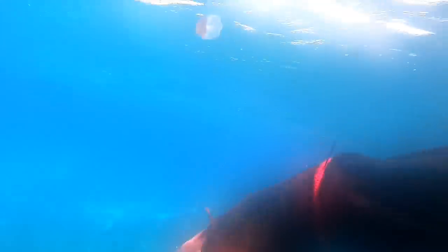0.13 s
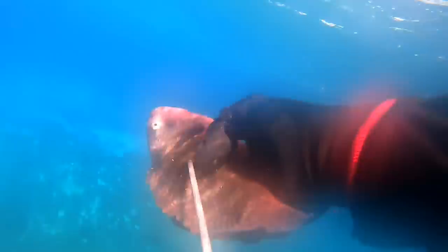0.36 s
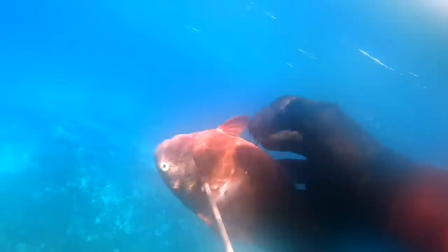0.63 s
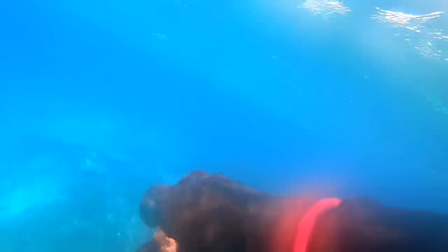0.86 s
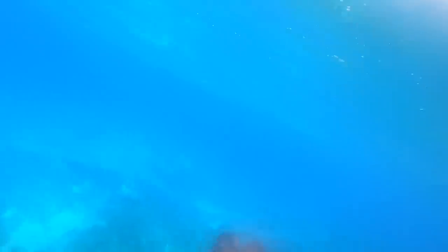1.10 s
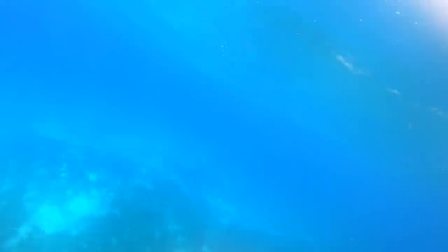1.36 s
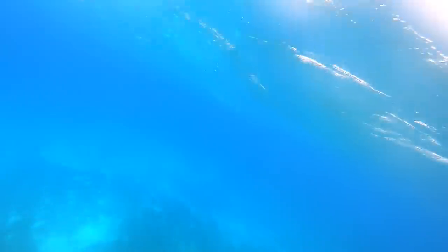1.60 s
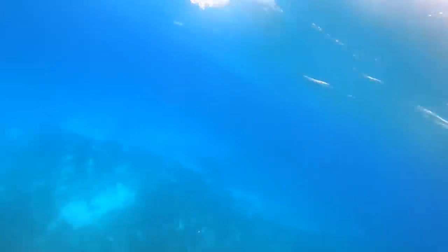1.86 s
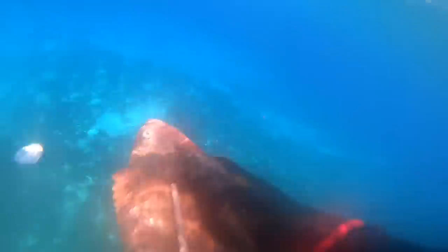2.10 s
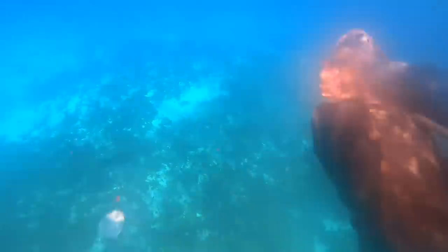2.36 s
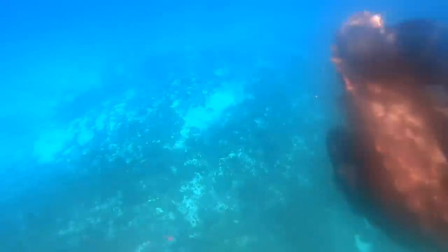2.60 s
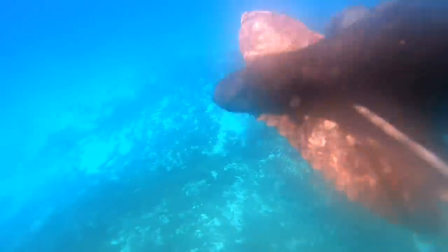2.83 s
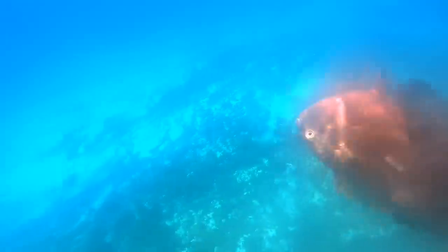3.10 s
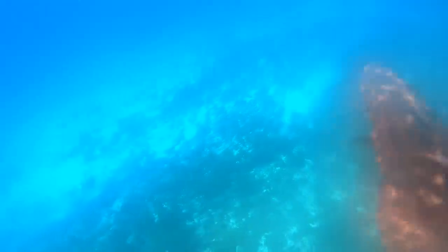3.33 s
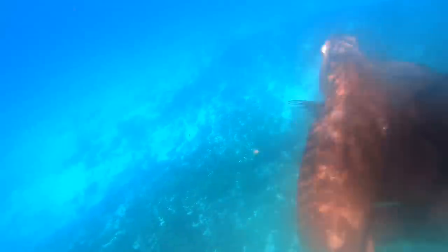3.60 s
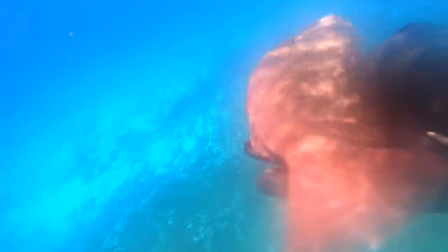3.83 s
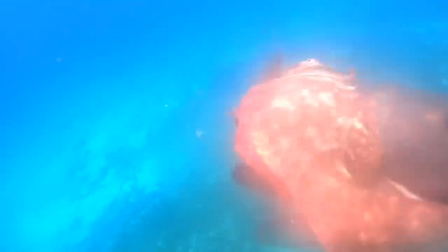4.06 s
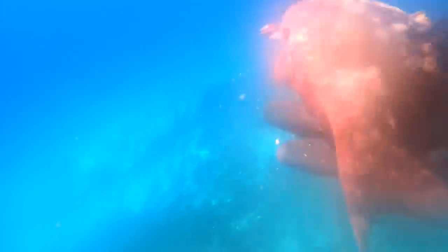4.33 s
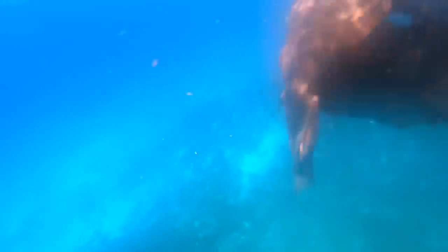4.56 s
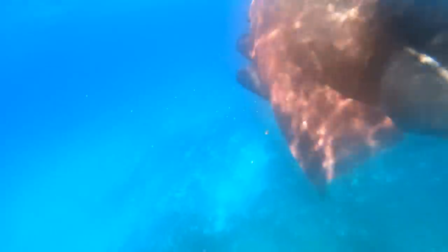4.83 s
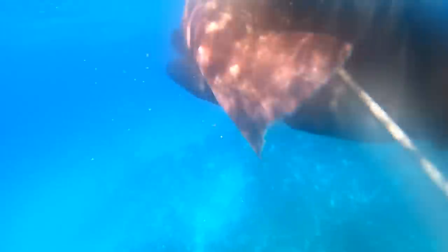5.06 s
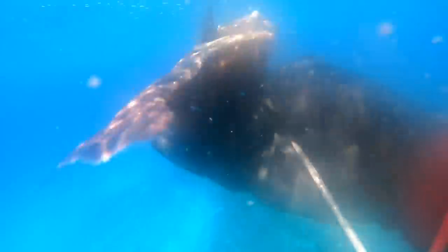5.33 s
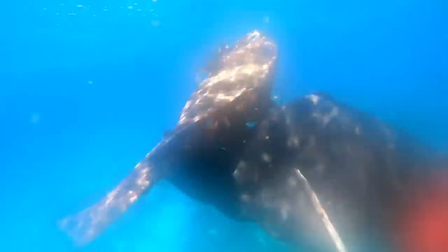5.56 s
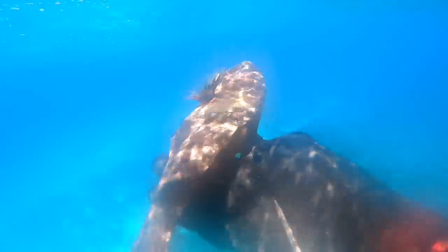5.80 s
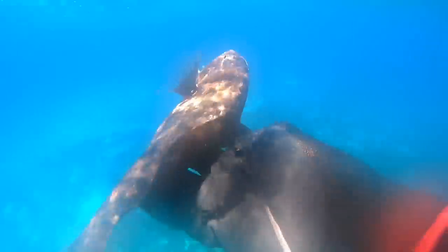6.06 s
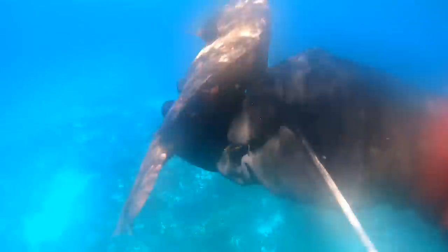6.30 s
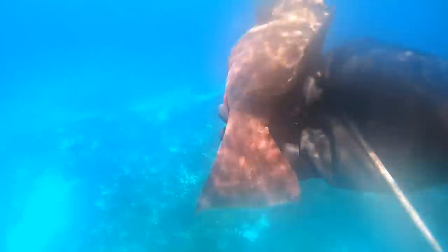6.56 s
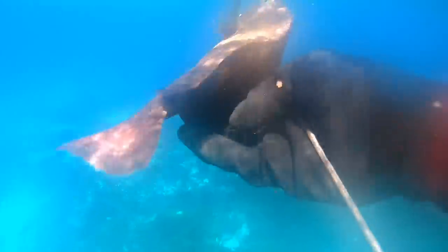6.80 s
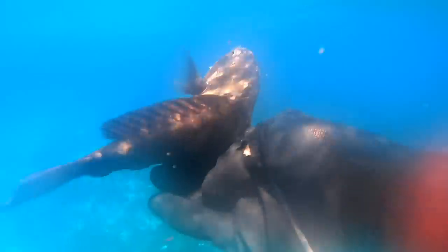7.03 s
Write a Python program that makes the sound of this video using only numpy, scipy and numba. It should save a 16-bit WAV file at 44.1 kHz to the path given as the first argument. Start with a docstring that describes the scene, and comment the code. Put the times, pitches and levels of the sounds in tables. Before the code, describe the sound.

Dull, boomy knocks thud against a sealed underwater housing amid muffled gurgles, then plinking bubbles and fine fizzing crackle over a reef.

```python
"""A brief gurgle and slosh, then dull knocks and plinking bubbles, heard by two microphones
inside a sealed camera housing floating just under the sea surface while a diver handles a spear and a fish.
Knocks and bubbles are dying rings; water, rubs and rushes are noise, clicks or tiny rings that swell and fade.
Behind them, reef snaps, crackle and fizz come through the housing's resonances.
The sound is centred at first, then it opens out to the sides."""
import sys
import numpy as np
from scipy import signal
from scipy.io import wavfile
from numba import njit

SR = 44100
rng = np.random.default_rng(int(sys.argv[2]) if len(sys.argv) > 2 else 0)


def field_ratio(decibels):
    """Amplitude ratio for a level in dB (20 dB per decade); scalars and array-likes work."""
    return 10 ** (np.asarray(decibels, dtype=float) / 20)


def dump(signal):
    """Clip the signal to [-1, 1] and save it as 16-bit WAV at the path in sys.argv[1]."""
    limited = np.clip(np.atleast_2d(signal).T, -1, 1)
    pcm = np.round(limited * 32767).astype(np.int16)
    wavfile.write(sys.argv[1], SR, pcm)


N = 316197  # length in samples


@njit
def svf(x, hz, width):
    """State-variable band-pass: lets one band through, gain 1 at its centre."""
    y, band, low = np.empty(len(x)), 0., 0.
    g, k = np.tan(np.pi * hz / SR), width / hz
    for i in range(len(x)):
        v = (band + g * (x[i] - low)) / (1 + g * (g + k))
        band, low, y[i] = 2 * v - band, low + 2 * g * v, k * v
    return y


@njit
def rings(n, s, hz, t60, size, rise, glide):
    """Dying sine rings that swell over a rise time; their pitch gains the share glide per second."""
    y = np.zeros(n)
    for j in range(len(s)):
        start = int(s[j] * SR)
        for i in range(max(min(int(t60[j] * SR), n - start), 0)):
            t = i / SR
            swell = (1 - np.exp(-t / rise[j])) * np.exp(-np.log(1000) * t / t60[j])
            y[start + i] += size[j] * swell * np.sin(2 * np.pi * hz[j] * t * (1 + glide[j] * t / 2))
    return y


def unit(x):
    """Scale to rms 1."""
    return x / np.sqrt(np.mean(x ** 2))


def curves(table):
    """Each column after the time as a value per sample."""
    s, *columns = np.transpose(table)
    return [np.interp(np.arange(N) / SR, s, c) for c in columns]


def through(x, peaks):
    """Steep resonances side by side, alternating in sign."""
    out = np.zeros(len(x))
    for k, (hz, width, db) in enumerate(peaks):
        once = svf(x, 1. * hz, 1.35 * width)
        out += (-1) ** k * field_ratio(db) * svf(once, 1. * hz, 1.35 * width)
    return out


def loudness(chance, spread_db):
    """Random gains: mostly weak, sometimes strong, never extreme."""
    return field_ratio(spread_db * np.minimum(-np.log(chance + 1e-9), 3))


def clicks(rate, spread_db):
    """Random clicks, rate per second on average, a few much stronger than the rest."""
    happens, chance = rng.random((2, N))
    sign = rng.choice([-1., 1.], N)
    return unit((happens < rate / SR) * loudness(chance, spread_db) * sign)


def grains(count, lo_hz, hi_hz, cycles, spread_db, glide):
    """Random short bubble rings of mixed pitch and size; higher ones glide faster."""
    when, pitch, chance, length = rng.random((count, 4)).T
    hz = lo_hz * (hi_hz / lo_hz) ** pitch
    size = loudness(chance, spread_db)
    t60 = cycles * (.5 + length) / hz
    return unit(rings(N, when * N / SR, hz, t60, size, 0.5 / hz, glide * hz))


def flutter(depth):
    """Quick random wavering of level, slower than about 130 Hz."""
    lowpass = signal.butter(4, 130., fs=SR, output="sos")
    return 1 + depth * unit(signal.sosfilt(lowpass, rng.standard_normal(N)))


def swells(s, hold, db, shape):
    """Gain over time of events that swell, hold and fade, over a steady bed."""
    rise, fall, bed_db = shape
    late = np.arange(0, N, 64)[:, None] / SR - s
    level_db = db - rise * np.maximum(-late, 0) - fall * np.maximum(late - hold, 0)
    gain = np.sqrt(np.sum(field_ratio(level_db) ** 2, axis=1) + field_ratio(bed_db) ** 2)
    return np.interp(np.arange(N), np.arange(0, N, 64), gain)


# Blows on the housing. Each row: start in seconds, level in dB, then low ring and edge
# in dB relative to that level, and thud pitch in Hz.
KNOCKS = [(0.074, -17.5, -29, -38, 186), (0.123, -14, -28, -30, 187), (0.167, -12.5, -5.5, -25, 212),
          (0.318, -28.5, -23, -56, 164), (0.589, -19.5, -6, -20.5, 188), (0.625, -17, -22, -21, 200),
          (0.719, -5.5, -19.5, -21, 223), (0.737, -12.5, -10, -22, 166), (0.784, -3, -9.5, -21.5, 433),
          (0.831, -15.5, 4, -48, 169), (0.869, -13, -6.5, -19, 193), (1.005, -10.5, -4, -29, 198),
          (1.028, -11.5, 3.5, -18, 150), (1.053, -17.5, 2, -13.5, 177), (1.083, -23.5, 2, -16, 227),
          (1.114, -16.5, -15, -28, 178), (1.166, -20, 7, -38, 190), (1.243, -9.5, 7, -10.5, 158),
          (1.425, -3.5, -2.5, -22, 198), (1.656, -15, 2, -46, 420), (2.055, -4, -1.5, -16, 202.6),
          (2.203, -17.5, -25, -25.5, 298), (2.209, -4, -5, -28, 196), (2.278, -9.5, -4, -20.5, 234),
          (2.286, -11.5, -24.5, -24.5, 209), (2.568, -19.5, -0.5, -20.5, 440),
          (2.662, -4, -1.5, -13.5, 220.7), (3.698, -29.5, -39, -31, 257), (3.895, -24.5, -21, -6, 424),
          (3.946, -15.5, -26, -41, 204), (4.223, -16, -32, -2.5, 287), (4.508, -35.5, -7, -1.5, 520),
          (4.543, -38.5, 14, 7.5, 284), (4.608, -11, -6, -16.5, 141), (4.63, -18, -37, -51, 195),
          (4.645, -23, 8, -42, 227), (5.487, -25, -1.5, -38, 170), (5.595, -10, -10.5, -21.5, 215),
          (5.849, -14, -2, -19, 210), (5.91, -26.5, -33, -1.5, 580), (6.226, -8.5, -3.5, -17.5, 422),
          (6.473, -30.5, -7, -19, 152), (6.656, -15, 2.5, -11, 204), (6.779, -9.5, -10, -12.5, 209),
          (7.036, -28.5, 4.5, -0.5, 179)]


def stirred(below_db, shape, lag_s):
    """Gain of the brief stir of water that goes with every knock, in dB relative to the knock."""
    s, db = np.transpose(KNOCKS)[:2]
    return swells(s + lag_s, 0, db + below_db, shape)


# Low ring of the housing under a knock, each mode with its own delay.
# Each row: pitch in Hz, level in dB, time to fall 60 dB in seconds, delay in seconds.
LOW_RING = [(85.6, -5.5, 0.22, 0.0065), (53, -8, 0.12, 0.003)]
# Slow sway of the housing. Each row: pitch in Hz, level in dB, 60 dB fall in seconds, delay in seconds.
SWAY = [(31.9, -20, 0.2, 0.016), (63.6, 19, 0.092, 0.004)]
# Middle modes of the thud. Each row: pitch in Hz, level in dB, 60 dB fall in seconds, delay in seconds.
THUD = [(177, -15, 0.09, 0.0053), (415.4, -22.5, 0.081, 0.00643), (507, -19.5, 0.03, 0.005955)]
# High edge of the knock. Each row: pitch in Hz, level in dB, 60 dB fall in seconds, delay in seconds.
EDGE = [(786, 0.86, 0.028, 0.0014)]
# Colour of the noisy crack. Each row: centre in Hz, width in Hz, level in dB.
CRACK = [(1070, 292, 7), (1825, 920, -10.5), (3140, 970, -22)]


def knocks():
    """Every blow sends a falling wave through the housing, rings its modes a little detuned, thuds and cracks."""
    s, db, ring_db, edge_db, hz = np.transpose(KNOCKS)
    one = np.ones(len(s))
    sway_db = -21.5 + 0.44 * db  # so the sway grows faster than the knock itself
    out = rings(N, s + 0.005, hz, 19.4 / hz, field_ratio(db - 10.0), 0.42 / hz, -8.0 * one)
    # fast high waves arrive first, so the first swing falls in pitch
    out += rings(N, s + 0.00241, 485.0 * one, 0.019 * one, field_ratio(db + 5.5), 0.0016 * one, -137. * one)
    for modes, share_db in ((LOW_RING, ring_db), (SWAY, sway_db), (THUD, 0 * s), (EDGE, edge_db)):
        for mode_hz, mode_db, t60, lag in modes:
            detuned = mode_hz * (1 + 0.088 * rng.standard_normal(len(s)))
            size = field_ratio(db + share_db + mode_db)
            out += rings(N, s + lag, detuned, t60 * one, size, 0.39 / mode_hz * one, 0 * s)
    hits = np.zeros(N)
    hits[(s * SR).astype(int)] = field_ratio(db + edge_db + 18.0)
    t = np.arange(2000) / SR / 0.003  # the crack is strongest after 3 ms
    burst = signal.fftconvolve(hits, t * np.exp(-t))[:N]
    return out + through(burst * rng.standard_normal(N), CRACK)


# What the housing lets through. Each row: centre in Hz, width in Hz, level in dB.
HOUSING = [(253, 110, -3), (421, 101, 9.5), (758.7, 67, 3.5), (1125, 600, 8.5), (1410, 1800, -0.5),
           (1690, 63, 12.5), (1952, 57, 6), (2192, 267, 8), (2956, 930, -5), (3257, 89, -2.5)]
# Single bubbles. Each row: start in seconds, level in dB, pitch in Hz, time to fall 60 dB in seconds.
BUBBLES = [(0.0736, -23.5, 1690, 0.075), (0.081, -22.5, 1350, 0.054), (0.432, -31, 2950, 0.024),
           (3.795, -29.5, 375, 0.084), (3.803, -35.5, 768, 0.056), (3.825, -23, 339, 0.072),
           (3.862, -24, 213.3, 0.16), (0.2, -32.5, 1410, 0.032), (1.701, -39, 445, 0.16),
           (1.714, -32.5, 1470, 0.033), (2.36, -32.5, 3110, 0.02), (2.3794, -34.5, 3140, 0.032),
           (2.394, -24.5, 2150, 0.023), (2.405, -34, 2300, 0.029), (2.6, -39, 2200, 0.033),
           (2.487, -34, 717, 0.044), (3.307, -32, 1430, 0.024), (3.4584, -23, 1358, 0.051),
           (4.0158, -40.5, 2034, 0.033), (4.178, -37.5, 3200, 0.033), (4.39, -37, 2710, 0.027),
           (4.287, -27, 1100, 0.044), (4.1032, -36, 2320, 0.051), (4.228, -14, 953, 0.045),
           (4.2853, -30.5, 1630, 0.093), (4.3215, -24.5, 1670, 0.041), (4.3514, -14, 1627, 0.024),
           (4.404, -35, 480, 0.068), (4.32, -39.5, 776, 0.12), (4.384, -39, 796, .15),
           (4.4128, -27.5, 1460, 0.012), (4.434, -37, 2020, 0.046), (4.44, -33.5, 1510, 0.049),
           (4.6098, -22.5, 1690, 0.034), (4.613, -18.5, 142, 0.39), (4.628, -19, 288, 0.24),
           (4.63, -16, 219, 0.14), (4.803, -28, 1600, 0.042), (4.813, -24.5, 1710, 0.045),
           (4.923, -32.5, 1500, .03), (4.756, -28.5, 3270, 0.03), (4.776, -27.5, 2820, 0.023),
           (4.856, -34, 3160, 0.029), (4.945, -34, 3060, 0.023), (4.903, -33.5, 3120, 0.026),
           (4.91, -28.5, 2080, 0.041), (4.975, -19.5, 1510, 0.044), (4.996, -22.5, 1360, 0.037),
           (5.024, -29, 1600, 0.027), (5.021, -26, 2190, 0.028), (5.041, -19, 1600, 0.039),
           (5.0527, -23, 1620, 0.057), (5.062, -25.5, 2060, 0.045), (5.106, -32.5, 1430, 0.056),
           (5.139, -33, 828, 0.098), (5.1514, -15, 1410, 0.037), (5.157, -28, 2090, 0.039),
           (5.2165, -19, 1253, 0.036), (5.239, -30, 1600, 0.061), (5.257, -21, 1380, 0.041),
           (5.336, -33.5, 3120, 0.021), (5.134, -29, 1314, 0.064), (5.226, -30, 1670, 0.026),
           (5.297, -37, 1560, 0.034), (5.3732, -25, 3140, 0.027), (5.387, -27.5, 1810, 0.019),
           (5.42, -32, 2030, .018), (5.524, -22, 2210, .016), (5.572, -29.5, 2020, 0.039),
           (5.41, -21.5, 1410, 0.014), (5.464, -30.5, 2640, 0.031), (5.525, -20.5, 1540, 0.04),
           (5.546, -13, 1487, 0.04), (5.688, -14, 1690, 0.035), (5.8605, -30.5, 2910, 0.02),
           (6.04, -21.5, 1600, 0.015), (6.204, -27, 1490, 0.025), (6.2445, -30, 2280, 0.035),
           (6.351, -30, 205, 0.068), (6.562, -29, 165.3, 0.27), (6.715, -16, 1440, 0.036),
           (7.1133, -19, 2290, 0.028), (7.149, -29.5, 1520, 0.019)]


def bubbles():
    """A tick as each bubble pinches off, then a near-sine that bends and flutters, and a beating neighbour."""
    s, db, hz, t60 = np.transpose(BUBBLES)
    glide = -0.89 + 0 * s  # share of the pitch gained per second: it falls
    rise = 0.059 * t60
    detune = 1 + 0.085 * rng.standard_normal(len(s))
    pinch = np.zeros(N)
    pinch[(s * SR).astype(int)] = field_ratio(db + 1.5)
    tick = through(pinch, HOUSING[2:])
    ring = flutter(0.17) * rings(N, s, hz, t60, field_ratio(db + 2.5), rise, glide)
    neighbour = rings(N, s, hz * detune, 0.48 * t60, field_ratio(db + 4.5), rise, glide)
    return tick + ring + neighbour


# Large bubbles that change size as they slide. Each row: start in seconds, level in dB, pitch in Hz,
# share of the pitch gained per second, time to fall 60 dB in seconds.
SLIDERS = [(.829, -14, 263, -12.5, 0.1), (4.148, -28, 531, -2, 0.16), (4.19, -26.5, 450, -3.5, 0.14),
           (4.425, -33, 400, 14, 0.1), (5.351, -25.5, 683, 5, .1), (5.387, -29.5, 688, 4, 0.13),
           (5.915, -25, 612, -5.5, 0.16)]


def sliders():
    """Bubbles squeezed along the housing: a fluttering ring that glides up or down."""
    s, db, hz, glide, t60 = np.transpose(SLIDERS)
    return flutter(0.3) * rings(N, s, hz, t60, field_ratio(db), 0.034 * t60, glide)


# Surges of water round the housing. Each row: start of the full level in seconds, hold in seconds,
# gurgle level in dB, slosh level in dB.
SURGES = [(0.0, 0.0053, -29, -31.5), (0.16, 0.037, -41.5, -39), (0.435, 0.046, -41.5, -51),
          (0.622, 0.22, -28.5, -26.5), (1.01, 0.05, -23.5, -24.5), (1.66, 0.011, -72, -40),
          (1.775, 0.57, -48.5, -61.5), (2.19, 0.038, -34, -38), (2.384, 0.37, -53, -48.5),
          (2.975, 0.082, -47.5, -58.5), (3.716, 0.0083, -43.5, -78), (3.827, 0.18, -31, -42),
          (4.19, 0.076, -32.5, -39), (4.517, 0.033, -27.5, -37), (4.616, 0.013, -23, -48),
          (4.736, 0.065, -35, -54.5), (5.354, 0.052, -44.5, -68), (5.5, 0.017, -44, -47),
          (6.043, 0.38, -47.5, -66), (6.355, 0.01, -34.5, -36), (6.562, 0.068, -36.5, -59),
          (7.015, 0.18, -49.5, -50)]
# How gurgles come and go. The row: swell in dB per second, fade in dB per second, still-water level in dB.
GURGLE_SHAPE = (780, 195, -60)
# How sloshes come and go. The row: swell in dB per second, fade in dB per second, still-water level in dB.
SLOSH_SHAPE = (276, 95, -82)
# Gurgle stirred by a knock. The row: swell in dB per second, fade in dB per second, steady level in dB.
KNOCK_GURGLE_SHAPE = (860, 1000, -99)
# Slosh stirred by a knock. The row: swell in dB per second, fade in dB per second, steady level in dB.
KNOCK_SLOSH_SHAPE = (2100, 720, -99)


def water():
    """Slow pressure surges and low lumpy gurgles with a rumble of water rubbing past the housing."""
    s, hold, gurgle_db, slosh_db = np.transpose(SURGES)
    slosh = svf(svf(rng.standard_normal(N), 35.0, 64.0), 46.0, 71.0)
    gurgle = grains(count=1500, lo_hz=141.1, hi_hz=506.0, cycles=12.5, spread_db=4.0, glide=0.031)
    rumble = through(rng.standard_normal(N), [(166, 140, 2.0), (320, 750, -3.0), (480, 160, 6.0)])
    # the gurgles are too small to carry deep bass, and the housing muffles their top
    band = signal.butter(3, [115., 560.], "band", fs=SR, output="sos")
    lumps = signal.sosfilt(band, 0.62 * gurgle + 0.16 * unit(rumble))
    lumps += 0.066 * unit(through(clicks(98.0, 3.6), HOUSING[2:3]))
    slosh_stir = stirred(-22, KNOCK_SLOSH_SHAPE, lag_s=0.016)
    gurgle_stir = stirred(-19.5, KNOCK_GURGLE_SHAPE, lag_s=0.0089)
    slosh_gain = np.hypot(swells(s, hold, slosh_db, SLOSH_SHAPE), slosh_stir)
    gurgle_gain = np.hypot(swells(s, hold, gurgle_db, GURGLE_SHAPE), gurgle_stir)
    return slosh_gain * unit(slosh) + gurgle_gain * lumps


# Hands and spear rubbing along the housing.
# Each row: start of the full level in seconds, hold in seconds, level in dB.
RUBS = [(0.579, 0.1, -49), (0.698, 0.069, -39), (1.004, 0.034, -32), (1.05, 0.074, -43.5),
        (1.224, 0.01, -46), (2.043, 0.0083, -39), (2.204, 0.051, -34.5), (2.274, 0.012, -41),
        (2.654, .018, -31.5)]
# How a rub comes and goes. The row: swell in dB per second, fade in dB per second, steady level in dB.
RUB_SHAPE = (3800, 3600, -99)
# Colour of a rub. Each row: centre in Hz, width in Hz, level in dB.
RUB_COLOUR = [(409, 250, 10), (930, 630, -4), (1600, 530, -0.5), (2700, 990, -15.5)]


def rubs():
    """Stick-slip scraping: dense uneven clicks and hiss ring the housing."""
    s, hold, db = np.transpose(RUBS)
    scrape = through(clicks(1800.0, 2.2) + 1.2 * rng.standard_normal(N), RUB_COLOUR)
    return swells(s, hold, db, RUB_SHAPE) * unit(scrape)


# Smooth rushes of water past the ports.
# Each row: start of the full level in seconds, hold in seconds, level in dB.
RUSHES = [(4.605, 0.037, -39), (4.863, 0.19, -50), (5.293, 0.13, -44), (6.042, 0.12, -39.5),
          (6.31, 0.15, -45), (6.553, 0.34, -50)]
# How a rush comes and goes. The row: swell in dB per second, fade in dB per second, steady level in dB.
RUSH_SHAPE = (520, 85, -99)
# Colour of a rush. Each row: centre in Hz, width in Hz, level in dB.
RUSH_COLOUR = [(427, 250, 2.5), (1385, 210, 9), (1600, 120, 6.5), (2180, 260, -8.5), (2950, 330, -28)]


def rushes():
    """Smooth dense water noise, partly different at each microphone."""
    s, hold, db = np.transpose(RUSHES)
    noise = rng.standard_normal(N) + 0.54 * rng.standard_normal((2, N))
    coloured = np.array([through(p, RUSH_COLOUR) for p in noise])
    return swells(s, hold, db, RUSH_SHAPE) * unit(coloured)


# Colour of snaps and crackle. Each row: centre in Hz, width in Hz, level in dB.
CRACKLE = [(2850, 395, 3.5), (4060, 6600, -18), (5030, 210, 2), (5910, 1100, -6), (7900, 2260, -6.5),
           (9800, 2300, -40.5), (13000, 3000, -55.5)]
# Single reef snaps. Each row: start in seconds, level in dB, ring pitch in Hz.
SNAPS = [(0.6588, -46, 4540), (0.8453, -47.5, 3880), (1.197, -44, 3870), (1.2333, -42, 3800),
         (1.331, -35.5, 4060), (1.5756, -35, 4140), (1.694, -42.5, 3860), (1.727, -38, 3880),
         (1.9316, -39, 3930), (1.9531, -36.5, 3750), (2.3305, -39.5, 4000), (3.305, -38.5, 3670),
         (3.4182, -43, 3870), (3.9018, -34.5, 5200), (3.9414, -29.5, 3780), (4.3213, -43, 7850),
         (4.785, -29.5, 5450), (4.863, -41, 7860), (5.06, -37, 4180), (5.2033, -44, 7200),
         (5.2585, -34, 5340), (5.294, -32.5, 9000), (5.316, -32.5, 5600), (5.3924, -37, 8100),
         (5.518, -40, 4100), (5.667, -45, 5800), (5.693, -34, 7900), (5.934, -38, 4430),
         (5.9485, -28, 5000), (5.9745, -31, 5130), (6.0152, -37.5, 4600), (6.2446, -37.5, 7600),
         (6.3283, -36.5, 6070), (6.4652, -35.5, 5000), (6.5631, -29.5, 4970), (6.7676, -33.5, 7400),
         (6.782, -34.5, 4030), (6.924, -40, 7900), (7.0637, -37, 3600), (7.1263, -36, 5430)]


def snaps():
    """Sharp reef snaps from all sides: a few milliseconds of sputter through the housing, and a brief ring."""
    s, db, hz = np.transpose(SNAPS)
    pan_db = 20.9 * np.tanh(rng.standard_normal(len(s)))  # left over right
    pans = field_ratio(np.array([pan_db, -pan_db]) / 2)
    hits = np.zeros((2, N))
    hits[:, (s * SR).astype(int)] = field_ratio(db - 4.5) * pans
    decay = np.exp(-np.arange(800) / SR / 0.0039)
    burst = signal.fftconvolve(hits, decay[None])[:, :N]
    sputter = burst * (rng.standard_normal(N) + 0.45 * rng.standard_normal((2, N)))
    coloured = [through(p, CRACKLE) + 1.76 * through(p, HOUSING[4:]) for p in sputter]
    ring = [rings(N, s, hz, 24 / hz, field_ratio(db + 3.0) * p, 1.5 / hz, 0 * s) for p in pans]
    return np.array(coloured) + ring


# Clouds of fine bubbles drifting past. Each row: start of the full level in seconds, hold in seconds,
# wash level in dB, crackle level in dB.
CLOUDS = [(0, 0.049, -59, -71), (0.44, 0.004, -52.5, -82), (1.043, 0.12, -57, -76),
          (1.228, 0.0077, -54.5, -73), (1.542, 1.746, -55, -72.5), (2.243, 0.012, -52, -82.5),
          (2.598, 0.018, -61, -100), (3.405, 0.31, -60, -66.5), (3.893, 0.41, -54.5, -60),
          (4.355, 0.018, -48.5, -59.5), (4.546, 0.31, -52.5, -57.5), (4.761, 0.14, -46, -51.5),
          (5.017, 0.016, -44.5, -57.5), (5.303, 0.17, -54, -54.5), (5.53, 0.008, -49, -72),
          (5.67, 0.032, -65, -60.5), (5.964, 0.012, -59, -54), (6.063, 0.15, -46.5, -57.5),
          (6.367, 0.046, -44.5, -66), (6.552, 0.1, -46.5, -53.5), (6.766, 0.1, -73, -57.5),
          (7.06, 0.14, -53.5, -57.5)]
# How the wash comes and goes. The row: swell in dB per second, fade in dB per second, steady level in dB.
WASH_SHAPE = (132, 234, -61.5)
# How the crackle comes and goes. The row: swell in dB per second, fade in dB per second, steady level in dB.
CRACKLE_SHAPE = (95, 44, -73)
# Wash stirred by a knock. The row: swell in dB per second, fade in dB per second, steady level in dB.
KNOCK_WASH_SHAPE = (570, 570, -99)
# Bubble swarm inside the wash. Each row: time in seconds, share (a plain gain).
SWARM = [(4.1, 0.46), (4.3, 0.91), (5.5, 0.86), (5.7, 0.87), (7.2, 0.43)]


def fizz():
    """Swarms of tiny bubbles, hiss and crackle, partly different at each microphone."""
    s, hold, wash_db, crackle_db = np.transpose(CLOUDS)
    wash_stir = stirred(-43.5, KNOCK_WASH_SHAPE, lag_s=0.0037)
    wash_gain = np.hypot(swells(s, hold, wash_db, WASH_SHAPE), wash_stir)
    crackle_gain = swells(s, hold, crackle_db, CRACKLE_SHAPE)
    swarm = grains(count=4000, lo_hz=1119.0, hi_hz=3420.0, cycles=35.0, spread_db=6.5, glide=0.00057)
    shared = curves(SWARM)[0] * swarm + rng.standard_normal(N) + 1.47 * clicks(200., 10.9)
    lower, upper = clicks(260.0, 8.5), clicks(250.0, 4.5)
    no_bass = signal.butter(3, 110., "high", fs=SR, output="sos")
    out = []
    for _ in range(2):
        wash = through(shared + 1.05 * rng.standard_normal(N), HOUSING)
        wash = signal.sosfilt(no_bass, wash)
        own = 0.8 * clicks(230.0, 9.6) + 0.11 * rng.standard_normal(N)
        # separate random clicks for the lower and upper crackle, partly shared
        crackle = through(lower + .5 * upper + own, CRACKLE[:4]) + through(upper + own, CRACKLE[4:])
        # the tiniest bubbles tick, each at its own pitch
        ticks = grains(count=900, lo_hz=3520.0, hi_hz=10460.0, cycles=47.0, spread_db=4.0, glide=0.00091)
        crackle = unit(crackle) + 0.44 * ticks
        out.append(field_ratio(4.5) * wash_gain * unit(wash) + field_ratio(-3.0) * crackle_gain * unit(crackle))
    return np.array(out)


def scene():
    """All sources at the two microphones."""
    return knocks() + water() + bubbles() + sliders() + snaps() + fizz() + rubs() + rushes()


# Bands the housing weakens. Each row: centre in Hz, width in Hz, depth from 0 to 1.
WEAK_BANDS = [(602, 91, 0.74), (2524, 150, 0.3)]


def weakened_bands(pair):
    """The housing takes away part of the sound in a few bands."""
    for hz, width, depth in WEAK_BANDS:
        pair = pair - depth * np.array([svf(p, 1. * hz, 1. * width) for p in pair])
    return pair


# Cavities at the left port. Each row: centre in Hz, width in Hz.
PORTS = [(1150, 740), (5400, 2600)]


def left_port(left):
    """Cavities turn the phase of the upper sound; a band round 704 Hz is lifted."""
    for hz, width in PORTS:
        left = left - 2 * svf(left, 1. * hz, 1. * width)
    return left + 0.81 * svf(left, 704.0, 260.0)


# Stereo image, centred at first, then it opens.
# Each row: time in seconds, width from 0 to 1, bass lean to the left from 0 to 1.
WIDTH = [(0, 0.01, 0), (3.2, 0, 0), (3.4, 0.55, 0.04), (5.3, 1, 0.03), (5.5, 1, 0.35), (7.2, 0.97, 0.34)]


def stereo_image(left, right):
    """Sets the spread above about 520 Hz and leans the bass below about 90 Hz to the left."""
    width, lean = curves(WIDTH)
    mid = (left + right) / 2
    highpass = signal.butter(2, 520., "high", fs=SR, output="sos")
    lowpass = signal.butter(1, 90., fs=SR, output="sos")
    side = width * signal.sosfiltfilt(highpass, left - mid)
    side += lean * signal.sosfilt(lowpass, mid)
    return np.array([mid + side, mid - side])


def top_cut(x):
    """Nothing passes above the cut-off."""
    return signal.sosfilt(signal.butter(12, 15600, fs=SR, output="sos"), x)


def record(dry):
    """The housing's weakened bands, the left port's cavities and the stereo image shape the finished mix."""
    left, right = weakened_bands(dry)
    mix = stereo_image(left_port(left), right)
    return top_cut(mix)


dry = scene()
out = record(dry)
dump(out)
```